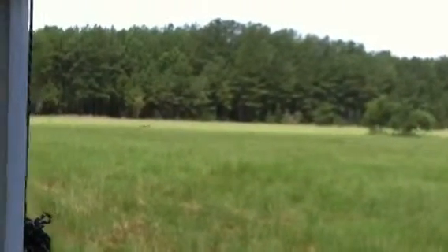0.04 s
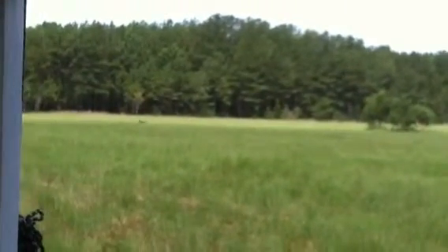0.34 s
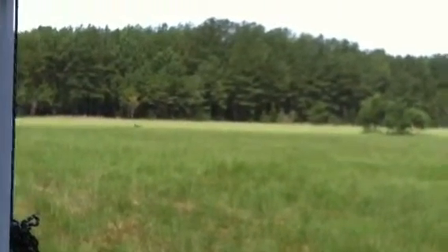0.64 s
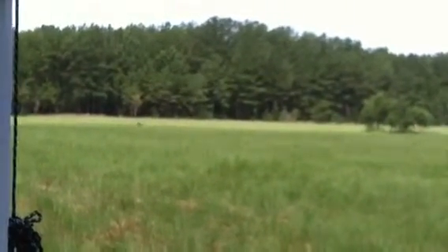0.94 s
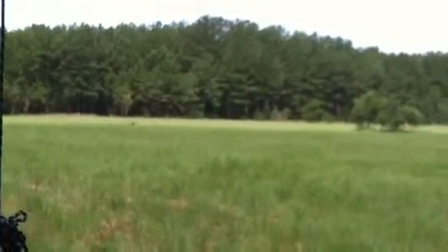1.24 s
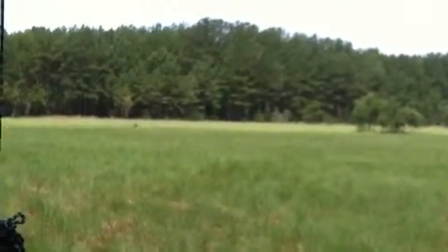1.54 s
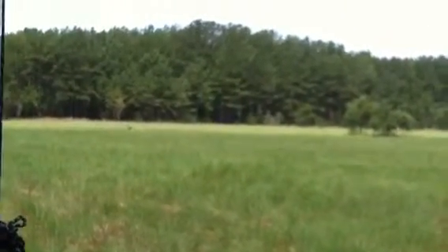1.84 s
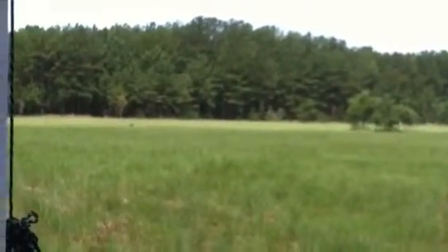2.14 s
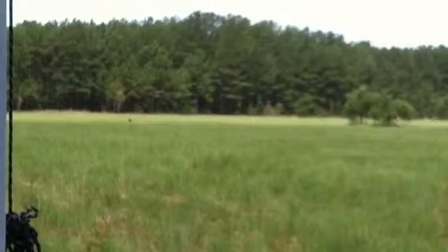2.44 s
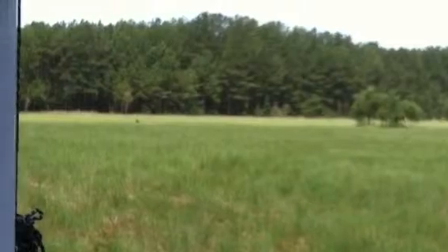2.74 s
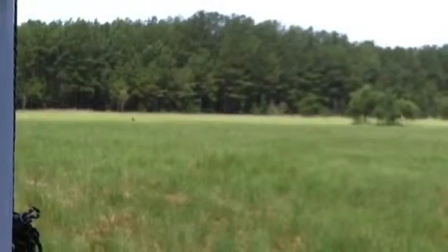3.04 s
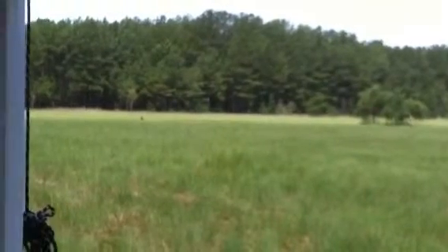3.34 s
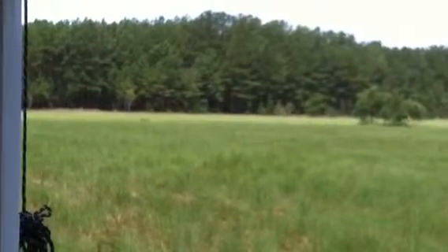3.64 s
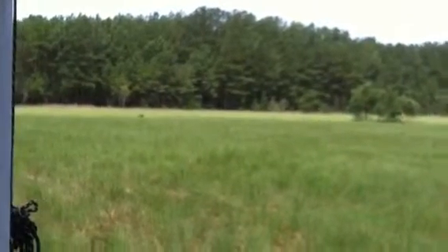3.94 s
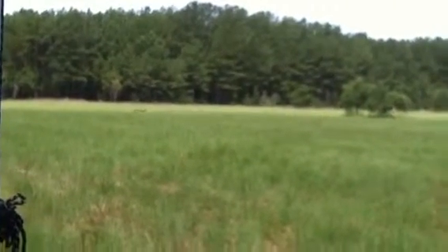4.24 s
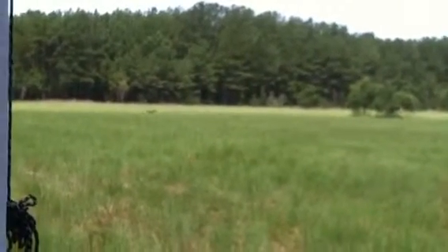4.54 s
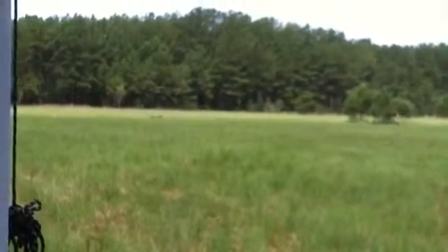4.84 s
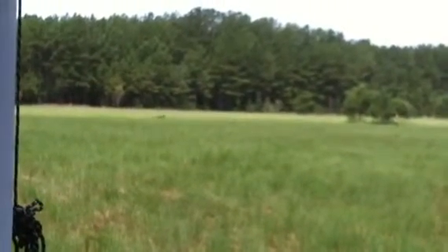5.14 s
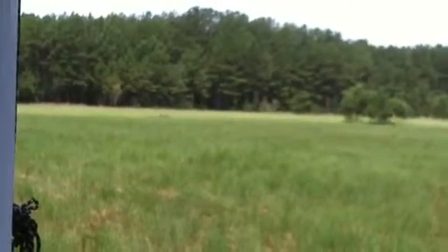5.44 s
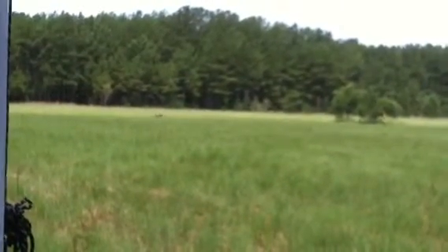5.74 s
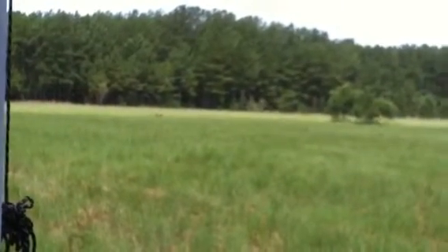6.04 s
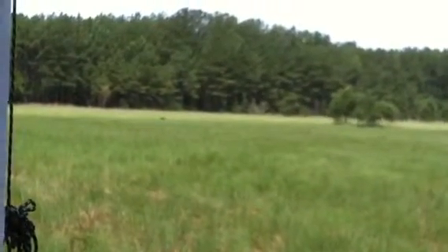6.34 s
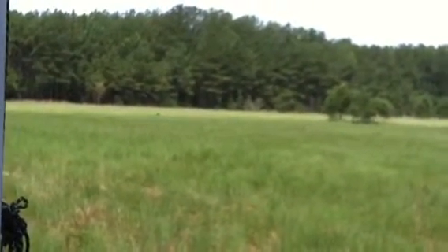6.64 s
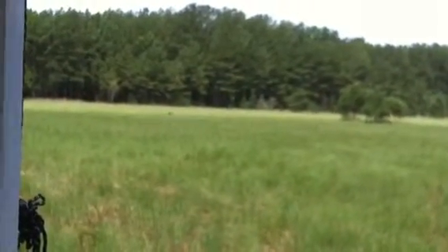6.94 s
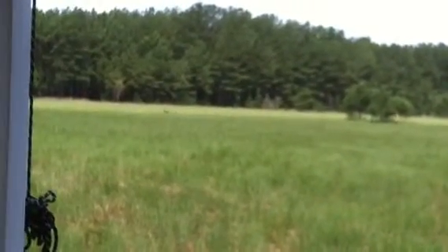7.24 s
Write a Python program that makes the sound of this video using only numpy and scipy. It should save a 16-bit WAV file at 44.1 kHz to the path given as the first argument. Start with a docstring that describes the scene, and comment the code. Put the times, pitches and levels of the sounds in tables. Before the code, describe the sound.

Small metal clips are handled close to the microphone in a shelter beside a meadow. They click and jingle sharply about a second in, then give lighter ticks, soft knocks, rubs and tiny squeaks with pauses between. A louder cluster of clinks comes near the end. Behind them runs a quiet, steady hiss of insects and open air, with a faint, far cricket at the start.

```python
"""In a shelter at the edge of a summer meadow, small metal clips are handled close to the microphone.
Each click is a quick swell of tiny impacts that rings the same few modes; edges snap and tink, and
between the clicks things rub, squeak and knock softly, with a short tail from the close walls.
Behind it lie a steady high hiss, likely insects in the grass, a far cricket and a low wash of open air."""
import sys
import numpy as np
from scipy import signal
from scipy.fft import rfft, irfft
from scipy.io import wavfile

SR = 44100
rng = np.random.default_rng(int(sys.argv[2]) if len(sys.argv) > 2 else 0)


def output_pcm(signal):
    """Save a mono or channel-first signal as 16-bit PCM at the path in sys.argv[1].

    Samples are clipped to [-1, 1] before scaling.
    """
    pcm = np.clip(np.atleast_2d(signal).T, -1, 1) * 32767
    wavfile.write(sys.argv[1], SR, np.round(pcm).astype(np.int16))


N = 321048
TIME = np.arange(N) / SR


def from_db(db):
    """Decibels to gain."""
    return 10 ** (np.asarray(db) / 20)


def rms(x):
    """Root mean square."""
    return np.sqrt(np.mean(x ** 2) + 1e-20)


def band(x, low_hz, high_hz, order=4):
    """Causal band-pass."""
    sos = signal.butter(order, [low_hz, min(high_hz, .45 * SR)], "band", fs=SR, output="sos")
    return signal.sosfilt(sos, x + 1e-18)


def drift(rate):
    """A random wobble of rms 1, with about `rate` turns a second."""
    knots = rng.standard_normal(int(N / SR * rate) + 3)
    wobble = np.interp(TIME * rate, np.arange(len(knots)), knots)
    return wobble / rms(wobble)


def arch(start, end):
    """Swell in and out between two times."""
    return np.sqrt(np.abs(np.sin(np.pi * np.clip((TIME - start) / (end - start), 0, 1))))


def resonance(x, hz, width_hz):
    """Two-pole resonance with gain 1 at its peak."""
    r = np.exp(-np.pi * width_hz / SR)
    feedback = [1, -2 * r * np.cos(2 * np.pi * hz / SR), r * r]
    return signal.lfilter(np.array([1, 0, -1]) * (1 - r * r) / 2, feedback, x + 1e-18)


def coloured_noise(spectrum):
    """Noise of rms 1, shaped by an EQ curve of (Hz, dB) points."""
    hz, db = np.transpose(spectrum)
    bins = np.maximum(np.fft.rfftfreq(N, 1 / SR), 1)
    eq = from_db(np.interp(np.log(bins), np.log(hz), db))
    noise = irfft(rfft(rng.standard_normal(N)) * eq, N)
    return noise / rms(noise)


def narrow_noise(hz, width_hz):
    """Noise of rms 1, twice through one resonance."""
    noise = resonance(resonance(rng.standard_normal(N), hz, width_hz), hz, width_hz)
    return noise / rms(noise)


def open_air(trim_db=2.0, waver_db=1.0):
    """A low, gently wavering wash of air over the meadow."""
    # The air's colour. Each row: frequency in Hz, relative level in dB.
    colour = [(20, -35), (55, -20), (95, -7.5), (150, 3.5), (300, 0.5), (560, 0), (750, -3), (1000, -1.5),
              (1400, -5.5), (2000, -5), (4000, -4.5), (9000, -39), (15000, -84)]
    # Its fader ride. Each row: time in seconds, level in dB before the trim.
    ride = [(0.0, -65.5), (1.76, -64.5), (2.05, -65.5), (2.55, -64), (3.2, -64), (3.65, -66), (4.2, -66),
            (5.54, -64.5), (6.24, -67.5), (6.53, -64.5), (6.69, -61), (7.28, -62.5)]
    level_db = np.interp(TIME, *np.transpose(ride)) + trim_db + waver_db * drift(9.1)
    return from_db(level_db) * coloured_noise(colour)


def insects(start_db=-60, rise_db_per_s=0.965, waver_db=0.54):
    """Many insects blur into an even, slowly growing hiss, with a finer sizzle on top."""
    # The colours of chorus and sizzle. Each row: frequency in Hz, relative level in dB.
    chorus_colour = [(1500, -40), (2100, -11), (2600, -2.5), (3200, -2), (3850, 2), (4300, -1.5),
                     (4900, 1.5), (5300, 1.5), (6000, 3), (6500, -5), (7100, -10), (8200, -17.5),
                     (10000, -59)]
    sizzle_colour = [(4000, -22.5), (6500, -2), (7800, -5), (8600, -7), (9300, -13.5), (10500, -18.5),
                     (12000, -40.5)]
    # The sizzle's fader ride. Each row: time in seconds, level in dB.
    sizzle_ride = [(0.0, -70), (0.53, -70.5), (1.36, -69), (2.11, -76.5), (3.89, -75.5), (5.45, -67.5),
                   (6.16, -71), (7.28, -65)]
    chorus = from_db(start_db + rise_db_per_s * TIME) * coloured_noise(chorus_colour)
    sizzle = from_db(np.interp(TIME, *np.transpose(sizzle_ride))) * coloured_noise(sizzle_colour)
    return (chorus + sizzle) * from_db(waver_db * drift(16))


def whines(jitter_hz=4):
    """Thin tones come and go in the hiss; the later ones creep up in pitch."""
    # Each row: start and end in seconds, pitch halfway in Hz, rise in Hz per second, rms level in dB.
    tones = [(-.5, .5, 4400, 0, -76), (-.5, .5, 4500, 0, -75), (-.5, .55, 4942, 0, -69.5),
             (-.5, .45, 5530, 0, -74), (-.4, .9, 5803, 0, -75), (-.5, .45, 6170, 0, -74),
             (-.4, .9, 6358, 0, -72), (-.5, .4, 6590, 0, -78), (-.5, 1, 7500, 0, -82),
             (-.5, .9, 7682, 0, -82), (-.5, 1, 8030, 0, -83), (-.5, .9, 8570, 0, -85),
             (5.2, 6.9, 6425, 28, -80), (4.2, 5.8, 6832, 30, -79), (4.1, 6.7, 7268, 31, -78.5),
             (3.6, 7.4, 7918, 33, -80), (3.8, 7.0, 8368, 35, -86), (4.4, 7.2, 8455, 35, -87),
             (4.0, 7.3, 8700, 36, -88)]
    out = np.zeros(N)
    for start, end, hz, rise, db in tones:
        pitch = hz + rise * (TIME - (start + end) / 2) + jitter_hz * drift(120)
        envelope = np.sqrt(2) * from_db(db + drift(23)) * arch(start, end)
        out += envelope * np.sin(2 * np.pi * np.cumsum(pitch) / SR)
    return out


def buzzes():
    """Narrow, breathy bands stand out of the hiss for a while."""
    # Each row: start and end in seconds, centre and width in Hz, rms level at the crest in dB.
    bands = [(-.2, .9, 980, 110, -77), (1.7, 3.3, 4910, 110, -71), (3.2, 5.2, 2965, 50, -74),
             (3.3, 4.9, 3990, 140, -68.5), (5.3, 7.4, 3930, 110, -67), (3.6, 6.8, 5520, 110, -73)]
    return sum(from_db(db) * arch(start, end) * narrow_noise(hz, width_hz)
               for start, end, hz, width_hz, db in bands)


def cricket(pitch_hz=2540, jitter_hz=55.5, pulses_per_s=11.95, first_pulse_s=0.081, level_db=-64.5):
    """A far cricket chirps in soft, even pulses, then falls silent."""
    pulses = np.abs(np.cos(np.pi * pulses_per_s * (TIME - first_pulse_s))) ** 3
    phase = 2 * np.pi * np.cumsum(pitch_hz + jitter_hz * drift(200)) / SR
    return from_db(level_db) * arch(-.6, 1.7) * pulses * np.sin(phase)


def shelter(x, t60=0.23, wall_hz=5000, predelay_s=0.004):
    """Close walls give a short, dull tail."""
    since = np.arange(int(.4 * SR)) / SR
    decay = np.exp(-np.log(1000) * since / t60) * (since > predelay_s)
    tail = band(rng.standard_normal(len(since)), 170, wall_hz, order=1) * decay
    return signal.fftconvolve(x, tail / np.sqrt(np.sum(tail ** 2)))[:N]


def rustle(level_db=-77.0, flutter_db=3):
    """Sleeves and straps stir faintly while the hands move."""
    # The hand movements. Each row: start and end in seconds.
    stirs = [(2.7, 4), (4.35, 6.4), (5.8, 6.0), (6.5, 6.6)]
    cloth = band(rng.standard_normal(N), 300, 3000, order=3)
    stirring = sum(arch(start, end) for start, end in stirs)
    gain = from_db(level_db + flutter_db * np.minimum(drift(35), 2))
    return gain * stirring * cloth / rms(cloth)


def squeaks(overtone_db=-16.0, rough=0.27, waver=0.025):
    """A surface slips unevenly under the hand: a brief, rough low tone that glides."""
    # Each row: start and length in seconds, first and last pitch in Hz, peak level in dB.
    slips = [(4.366, 0.057, 220, 182, -54.5), (4.44, 0.039, 169, 149, -59), (4.558, 0.025, 188, 260, -57),
             (4.578, 0.053, 530, 503, -58), (5.528, 0.022, 285, 245, -47), (5.533, 0.025, 176, 157, -53),
             (5.549, 0.031, 304, 259, -51.5), (5.8, 0.027, 540, 376, -55.5), (6.513, 0.037, 565, 446, -45),
             (6.522, .04, 279, 188, -52.5), (6.563, 0.029, 563, 525, -48.5), (6.73, 0.032, 508, 470, -47),
             (6.75, 0.032, 236, 180, -49)]
    out = np.zeros(N)
    grain = 1 + rough * drift(200)
    unsteady = 1 + waver * drift(400)
    for start, length, start_hz, end_hz, db in slips:
        along = np.linspace(0, 1, int(length * SR))
        span = round(start * SR) + np.arange(len(along))
        pitch = (start_hz + (end_hz - start_hz) * along) * unsteady[span]
        phase = 2 * np.pi * np.cumsum(pitch) / SR
        tone = np.sin(phase) + from_db(overtone_db) * np.sin(2 * phase)
        out[span] += from_db(db) * np.sin(np.pi * along) * tone
    return out * grain


def knocks(fade_s=0.0057, edge_ratio=1.9):
    """A dull blow on the housing sets in at once and dies quickly in a broad, woody band."""
    # Each row: start in seconds, band centre in Hz, level in dB.
    blows = [(2.705, 1310, -42.5), (4.431, 240, -47.5), (4.759, 1030, -44.5), (5.149, 1040, -47),
             (5.151, 380, -53), (5.321, 517, -39), (5.325, 220, -41.5), (5.352, 430, -42),
             (5.368, 260, -46), (5.396, 320, -51), (5.464, 397, -50.5), (5.533, 295, -45),
             (6.572, 515, -49), (6.689, 270, -46), (6.75, 336, -40.5), (7.061, 604, -41)]
    out = np.zeros(N)
    since = np.arange(int(.08 * SR)) / SR
    envelope = np.exp(-since / fade_s)
    for start, hz, db in blows:
        burst = envelope * rng.standard_normal(len(since))
        blow = band(burst, hz / edge_ratio, hz * edge_ratio, order=3)
        span = round(start * SR) + np.arange(len(since))
        out[span] += from_db(db) * rms(envelope) * blow / rms(blow)
    return out


def tinks(swell_s=0.0023, fade_s=0.0036, rough=0.18, waver=0.0084):
    """Two edges touch: one resonance swells, unsteady as they grate, and dies away."""
    # Each row: time of the peak in seconds, pitch in Hz, peak level in dB.
    touches = [(0.950, 8100, -51), (1.099, 4000, -43.5), (1.099, 7850, -52), (1.101, 8250, -54),
               (1.134, 2886, -35), (1.137, 5970, -28.5), (1.137, 7440, -38), (1.137, 10130, -34),
               (1.137, 421, -41.5), (1.138, 3210, -41), (1.138, 9480, -40), (1.139, 1860, -38),
               (1.139, 6777, -36), (1.141, 4700, -30), (1.141, 2060, -33.5), (1.143, 2280, -41),
               (1.160, 5420, -47), (1.471, 1560, -46), (1.472, 4250, -39), (1.473, 4435, -46),
               (1.473, 613, -46), (1.475, 2020, -41), (2.611, 973, -50), (2.611, 2260, -48),
               (2.624, 1730, -52), (2.640, 1495, -41), (2.71, 1188, -37.5), (2.709, 1470, -37.5),
               (2.710, 2095, -40), (2.823, 1730, -41.5), (2.835, 1610, -53), (3.423, 865, -56),
               (3.607, 1440, -46.5), (3.613, 1820, -45.5), (4.435, 1200, -52), (4.434, 519, -51.5),
               (4.484, 1630, -53), (4.513, 1680, -53), (4.589, 1200, -53), (5.323, 934, -43),
               (5.328, 1916, -41), (5.330, 1588, -38.5), (5.331, 1320, -45), (5.355, 450, -42),
               (5.372, 1850, -53), (5.398, 1640, -52), (6.565, 2100, -52), (6.688, 1780, -39.5),
               (7.017, 2190, -42), (7.018, 1196, -41.5), (7.018, 4040, -35.5), (7.020, 3530, -38),
               (7.020, 3690, -37), (7.065, 557, -36), (7.074, 6298, -33.5), (7.077, 1593, -32.5),
               (7.077, 2290, -34), (7.077, 5650, -36), (7.078, 9330, -42.5), (7.080, 955, -39),
               (7.081, 3800, -33), (7.082, 3994, -36), (7.083, 3493, -39), (7.117, 3063, -42),
               (7.118, 1873, -42), (7.119, 626, -44), (7.121, 2310, -37.5)]
    out = np.zeros(N)
    since = np.arange(-int(.03 * SR), int(.06 * SR)) / SR
    away = np.maximum(-since / swell_s, since / fade_s)
    envelope = np.exp(.5 - np.hypot(away, .5))  # a rounded crest of height 1
    unsteady = 1 + waver * drift(900)
    for peak_s, hz, db in touches:
        span = round((peak_s + since[0]) * SR) + np.arange(len(since))
        phase = 2 * np.pi * np.cumsum(hz * unsteady[span]) / SR
        out[span] += from_db(db) * envelope * np.sin(phase)
    return out * (1 + rough * drift(700))


def clip_body(force, ring_db=2.5, width_scale=0.94, dry_db=-0.5):
    """The dry crack of the impacts plus the modes that they set ringing in the metal."""
    # Each row: frequency in Hz, width in Hz before scaling, relative level in dB.
    modes = [(450, 120, -8), (778, 34, -1.5), (985, 24, -9), (1270, 55, -11), (1585, 75, -1),
             (1850, 110, -2.5), (2000, 50, -9), (2280, 29, -11), (2775, 28, -10), (3220, 40, -2.5),
             (3480, 53, -6), (3750, 81, -4), (3870, 45, -5), (4070, 49, -4), (4240, 55, -3), (4420, 39, -9),
             (4750, 42, 0.5), (6040, 120, -9), (6700, 76, -5), (7650, 59, -6), (8700, 68, 0),
             (9400, 60, -4)]
    ring = sum(from_db(db) * resonance(force, hz, width * width_scale) for hz, width, db in modes)
    return from_db(dry_db) * force + from_db(ring_db) * ring


def snaps(fade_s=0.011):
    # Each row: start in seconds, strike level in dB.
    strikes = [(0.962, -52.5), (1.135, -42), (1.458, -37.5), (2.604, -55), (2.707, -58), (5.324, -47.5),
               (6.685, -46), (6.992, -40), (7.07, -36), (7.116, -39)]
    # The crack's colour. Each row: frequency in Hz, relative level in dB.
    colour = [(60, -30), (300, -17), (1800, -0.5), (5500, 4.5), (10000, -30), (12000, -21), (15500, -26)]
    envelope = sum(from_db(db) * (TIME >= start) * np.exp(-np.abs(TIME - start) / fade_s)
                   for start, db in strikes)
    return clip_body(envelope * coloured_noise(colour))


def contact_envelopes(ranges, pivot_hz=2000, rub_swell_s=0.013, rub_tilt_db=-1):
    """One envelope per range: clicks swell fast, rubs more slowly, and the lows fade last."""
    # The clips click together. Each row: time of the peak and swell time in seconds, level in dB,
    # tilt in dB per octave, weight of the low knock in dB.
    clicks = [(0.965, 0.0044, -43, 2.5, 1.5), (1.128, 0.0019, -31.5, 0.5, -5), (1.138, 0.0044, -33.5, 4, 3),
              (1.191, 0.0043, -48.5, 4, 9), (1.468, 0.0043, -34.5, 2, 1), (1.552, 0.0036, -61, 7.5, 0),
              (1.652, 0.0025, -59, 5, 21), (1.76, 0.0079, -45.5, -1, -2.5), (1.805, 0.0047, -41, -3, -5.5),
              (1.821, 0.0083, -61, 11, 5), (2.466, 0.0062, -58, -3, 1.5), (2.61, 0.002, -47, -1.5, -18),
              (2.623, 0.0015, -55, -3.5, -11), (2.636, .0025, -47, 4.5, -2), (2.651, .004, -50, 1, -12),
              (2.665, .003, -50, 0, -17), (2.699, .002, -47, -4, -14), (2.708, 0.0025, -40, -2.5, -13),
              (2.823, .002, -57, -3, -5), (3.197, 0.004, -51.5, -1.5, -12),
              (3.303, 0.0025, -52.5, -3.5, -3.5), (3.423, 0.0037, -52.5, -6, -19),
              (3.45, 0.0027, -54, -2, -20), (3.609, 0.0055, -52.5, -0.5, -12),
              (4.513, 0.0022, -52, -4, -17), (4.762, 0.0012, -52, 0, -1), (5.152, 0.00088, -47.5, -3, -7),
              (5.327, 0.0014, -38, -1.5, -3.5), (5.340, .002, -46.5, -1, -4), (5.354, 0.0015, -48, -1, -7),
              (5.372, .002, -50.5, -2.5, -8), (5.398, 0.002, -50, -2.5, -5), (5.414, .004, -54, -1, 1),
              (5.536, 0.0031, -57, -3.5, -5), (6.625, 0.0088, -52, -6, -13),
              (6.688, 0.0024, -38, -4.5, -11), (6.71, .003, -49, -3, -18), (6.753, .0055, -43, -5, -3.5),
              (6.995, .005, -43.5, -0.5, -5), (7.018, 0.0056, -43.5, -1.5, -1), (7.047, 0.0023, -49, -5, 1),
              (7.064, 0.003, -39, 0, -2), (7.078, 0.0053, -32, 1.6, 2.5), (7.112, 0.0011, -40, -1, -11),
              (7.119, 0.003, -33.5, 0.5, -8), (7.13, .004, -44.5, -1, 1), (7.143, 0.011, -42.5, 1, 4.5)]
    # The clips slide. Each row: time of the peak in seconds, level in dB, weight of the low knock in dB.
    slides = [(1.535, -56.5, 9), (1.735, -54.5, 6.5), (1.786, -47, -1), (1.834, -54, 3), (4.455, -60, 4.5),
              (4.497, -55, -8), (4.593, -61.5, 10), (5.48, -55.5, -9), (5.559, -58, 3), (5.838, -54, -4),
              (5.869, -58, 9.5), (5.897, -54.5, -3), (5.936, -49.5, -7.5), (6.57, -53, 2)]
    # Any contact's colour, range by range. Each row: level offset in dB, fade time in seconds.
    colour = [(-6, 0.0091), (-1.5, 0.0084), (-1, 0.008), (-13.5, 0.0075)]
    # Each range's share of the knock weight: all goes to the lowest.
    knock_share = np.array([1, 0, 0, 0])
    rubs = [(peak_s, rub_swell_s, db, rub_tilt_db, knock_db) for peak_s, db, knock_db in slides]
    octaves = np.log2(np.array(ranges) / pivot_hz).mean(axis=1)
    colour_db, fades_s = np.transpose(colour)
    power = np.zeros((len(ranges), N))
    for peak_s, swell_s, db, tilt_db, knock_db in clicks + rubs:
        near = np.abs(TIME - peak_s) < .2
        since = TIME[near] - peak_s
        away = np.maximum(-since / swell_s, since / fades_s[:, None])
        shape = np.exp(-np.hypot(away, .5))  # a rounded crest between exponential flanks
        levels_db = db + colour_db + tilt_db * octaves + knock_db * knock_share
        power[:, near] += (from_db(levels_db)[:, None] * shape) ** 2
    return np.sqrt(power)


def clips(impacts_per_s=12000, size_spread_db=2.5, hard_db=-50, fizz_db=-3.5, shake_db=-17.0):
    """Metal slides over metal: tiny impacts swell and fade; the harder the contact, the brighter."""
    # The ranges of knock, clack, ring and sparkle. Each row: low and high edge in Hz.
    ranges = [(215, 737), (780, 2510), (2450, 6800), (6900, 10590)]
    impacts = (rng.random(N) < impacts_per_s / SR) * rng.choice([-1, 1], N)
    impacts = impacts * from_db(size_spread_db * rng.standard_normal(N))
    envelopes = contact_envelopes(ranges)
    knock, sparkle = envelopes[0], envelopes[-1]

    def grains(envelope, low_hz, high_hz, order):
        """The impacts within one band, their rms following the envelope."""
        steady_rms = rms(band(impacts, low_hz, high_hz, order))
        return band(impacts * envelope, low_hz, high_hz, order) / steady_rms

    force = sum(grains(envelope, *edges, order=5) for envelope, edges in zip(envelopes, ranges))
    # only hard contacts are short enough to reach the top of hearing
    hardness = sparkle / (sparkle + from_db(hard_db))
    fizz = from_db(fizz_db) * grains(sparkle * hardness, 11000, 14600, order=3)
    # heavy knocks shake the microphone a little
    shake = from_db(shake_db) * grains(knock, 75, 220, order=2)
    return clip_body(force) + fizz + shake


def scene(reverb_db=-19.5):
    """Close handling over the far meadow, the same in both channels."""
    handling = clips() + snaps() + tinks() + knocks() + squeaks() + rustle()
    reverb = from_db(reverb_db) * shelter(handling)
    meadow = open_air() + insects() + whines() + buzzes() + cricket()
    mono = handling + reverb + meadow
    return np.array([mono, mono])


def record(dry):
    """A steep high cut at 15.6 kHz."""
    return signal.sosfilt(signal.ellip(10, .1, 80, 15600, fs=SR, output="sos"), dry)


dry = scene()
out = record(dry)
output_pcm(out)
```